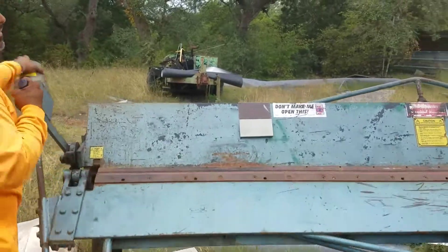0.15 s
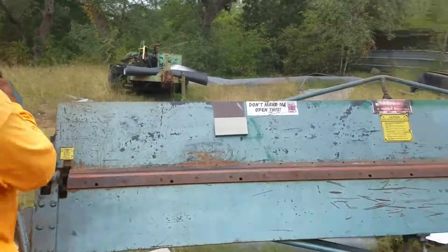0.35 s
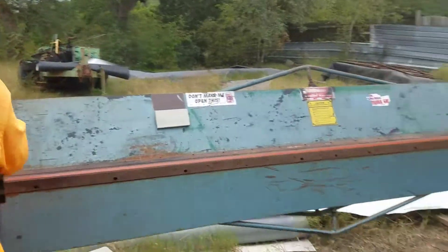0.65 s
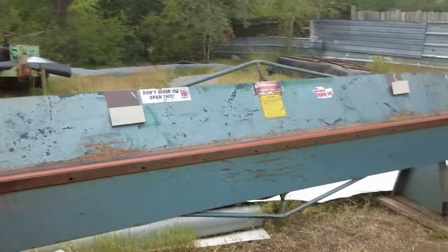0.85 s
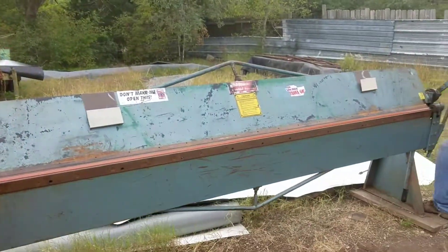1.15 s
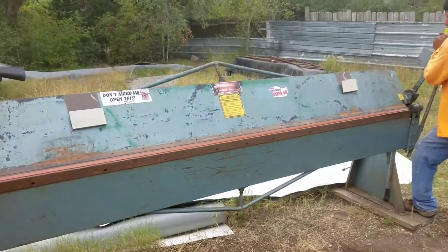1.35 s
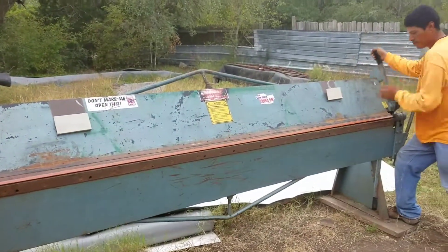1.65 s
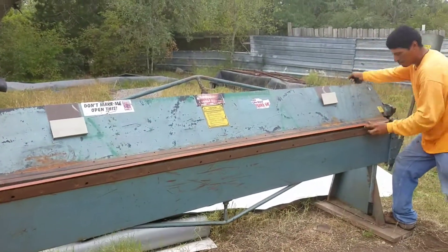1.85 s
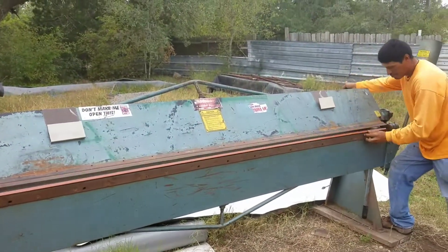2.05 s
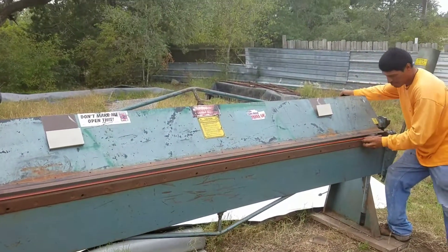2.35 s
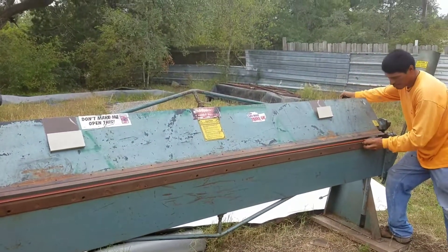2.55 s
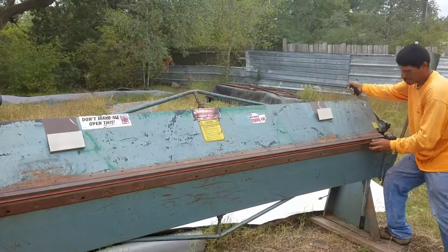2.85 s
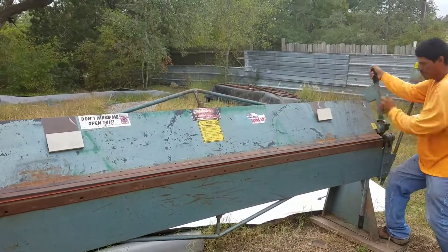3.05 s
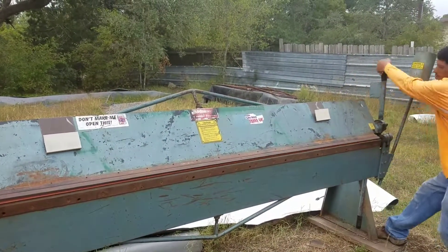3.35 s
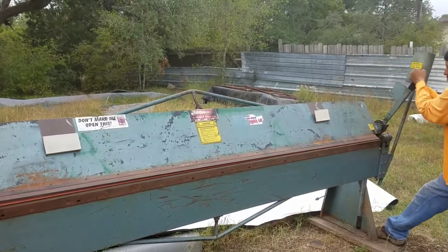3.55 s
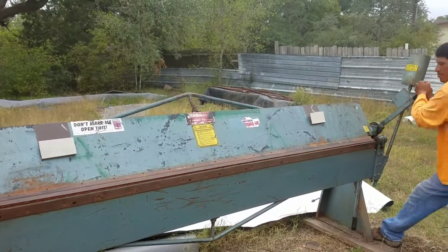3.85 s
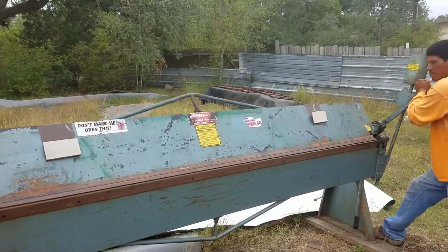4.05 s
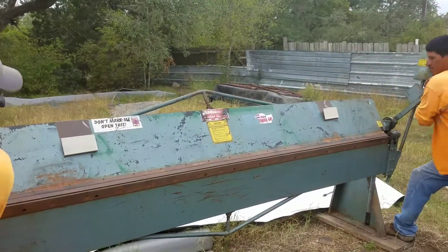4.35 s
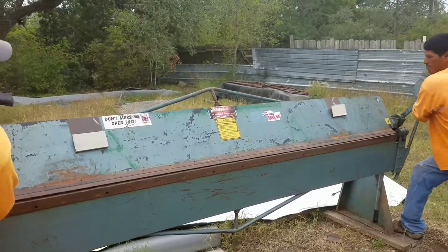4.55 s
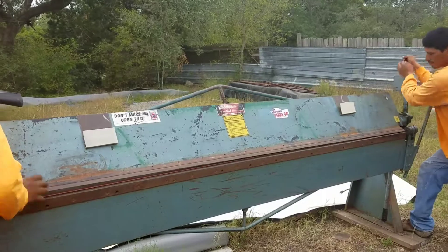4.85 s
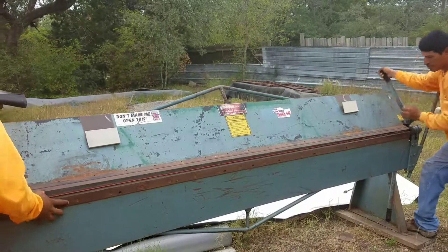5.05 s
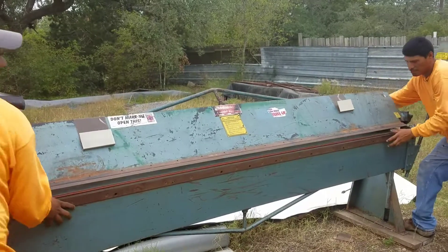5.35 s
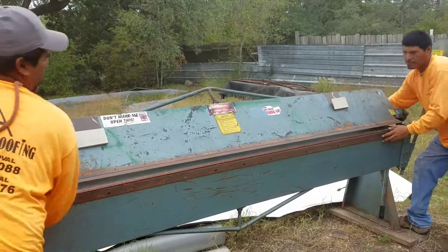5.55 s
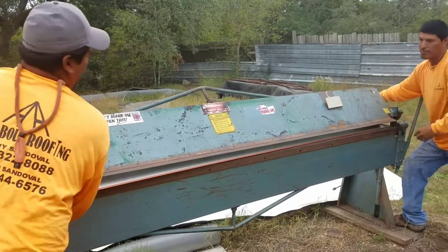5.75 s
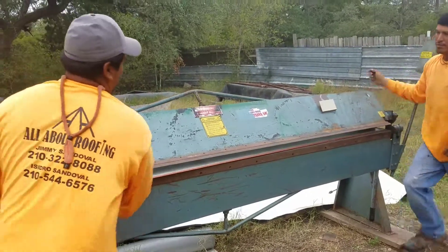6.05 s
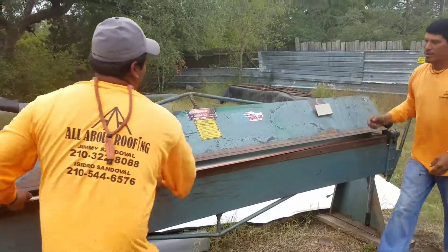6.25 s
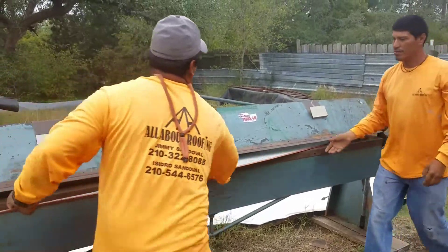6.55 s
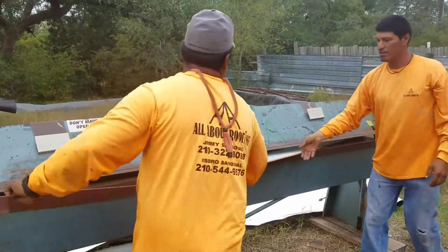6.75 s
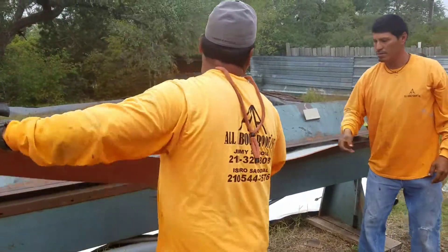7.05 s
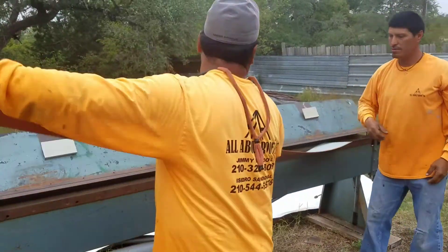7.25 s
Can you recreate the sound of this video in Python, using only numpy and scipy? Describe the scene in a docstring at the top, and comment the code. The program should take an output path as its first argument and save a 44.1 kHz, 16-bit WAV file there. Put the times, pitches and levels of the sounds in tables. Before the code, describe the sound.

In a quiet yard, a hand-worked metal bending machine is heard close by. Light steel knocks, dry ticks and short rubs of sheet metal build into sharper clanks and scrapes. A run of heavier, rattling clamp knocks follows, as faint engines drone far off and a low rumble rises. Finally the sheet is drawn out with a long rasping slide that sings for a moment, and one more hard clank falls.

```python
"""A long steel bending brake (a machine that folds sheet metal) stands in quiet outdoor air in a yard.
From the start, thin sheet rubs through its jaws in short drags, its edge ticks, and the clamp handles
knock; each slip or knock makes the steel ring. From about 1.4 s engines drone far off, and near 3 s
a low rumble swells as the knocks crowd together. From 6 s the sheet is drawn out in one long, gritty
pull: it sings briefly, and one last hard knock falls."""
import sys
import numpy as np
from scipy import signal
from scipy.fft import rfft, irfft, next_fast_len
from scipy.io import wavfile
from scipy.ndimage import uniform_filter1d

SR = 44100
rng = np.random.default_rng(int(sys.argv[2]) if len(sys.argv) > 2 else 0)


def dump(signal):
    """Clip the signal to [-1, 1] and save it as 16-bit WAV at the path in sys.argv[1]."""
    limited = np.clip(np.atleast_2d(signal).T, -1, 1)
    pcm = np.round(limited * 32767).astype(np.int16)
    wavfile.write(sys.argv[1], SR, pcm)


N = 325899

PLACES = 4   # contact spots on each steel body
PART_EDGES_HZ = 260, 700, 2500, 7500   # split five "parts", low to high: legs, frame, sheet, grit, hiss
# stereo width ("mid" is what both ears share, "side" is how they differ): f/Hz, side minus mid/dB
WIDTH = [(60, -9.5), (200, -13.5), (380, -20), (700, -5), (1290, -3.5), (2380, -2), (4400, -0.5),
         (15000, -2.5)]


def amp(db):
    """Turn decibels into a gain."""
    return 10 ** (np.asarray(db) / 20)


def in_time(rows):
    """Turn a table with times in its first column into curves, one value a sample."""
    times, *columns = np.transpose(rows)
    return [np.interp(np.arange(N) / SR, times, column) for column in columns]


def at_hz(points, hz):
    """Read a table at the given frequencies, on a log scale."""
    table = np.array(points)
    return np.interp(np.log(hz), np.log(table[:, 0]), table[:, 1])


def drift(per_s):
    """A random wander that takes a new direction per_s times a second."""
    return np.interp(np.arange(N) * per_s / SR, np.arange(1000), rng.standard_normal(1000))


def add(track, start_s, sound):
    """Lay a short sound into a track."""
    at = round(start_s * SR)
    track[:, at:at + sound.shape[1]] += sound[:, :N - at]


def air():
    """Far traffic and leaves make a smooth noise; only its bass swells."""
    # tone of the air noise as heard: f/Hz, relative level/dB
    spectrum = [(15, -29), (25, -32.5), (59, -5), (145, -2), (180, -8), (242, -3), (503, -17.5), (677, -9),
                (3250, -37), (4370, -45), (6050, -61.5), (10400, -44), (16000, -49.5)]
    # rumble below 270 Hz: t/s, level/dB
    rumble = [(0.0, -59), (1.6, -58.5), (2.4, -60), (3.1, -48), (3.85, -42.5), (4.5, -45), (5.1, -51.5),
              (6.8, -47.5), (7.39, -44)]
    hz = np.maximum(np.arange(N // 2 + 1) * SR / N, 1)
    noise = rfft(rng.standard_normal((2, N))) * amp(at_hz(spectrum, hz))
    noise[1] *= amp(at_hz(WIDTH, hz))
    low, high = irfft(noise * (hz < 270), N), irfft(noise * (hz >= 270), N)
    swell = amp(in_time(rumble)[0])
    return (low * swell + high * np.median(swell) * amp(-3.5)) / np.std(low[0])


def steel_rings(spectrum, strong_modes):
    """One click sets off many fading tones (modes) in steel. Axes: place, part, mid/side, time."""
    # how long steel rings: f/Hz, time to fade by 60 dB/s
    ring_times = [(200, 0.26), (500, 0.29), (1500, 0.2), (4500, 0.11), (12000, 0.028)]
    crack_db, crack_s = 9.5, 0.00099   # the first wave from the contact stands above the ring
    cloud_hz = np.linspace(10, 127, 1000) ** 2 * np.exp(rng.normal(0, .003, 1000))
    strong_hz, width_hz, above_db = np.transpose(strong_modes)
    hz = np.append(cloud_hz, strong_hz)
    t60 = np.append(at_hz(ring_times, cloud_hz), np.log(1000) / (np.pi * width_hz))
    filled_hz = np.append(np.gradient(np.sort(cloud_hz)), amp(2 * above_db) * width_hz * np.pi / 2)
    height = amp(at_hz(spectrum, hz)) * np.sqrt(filled_hz / t60)
    share = rng.standard_normal((PLACES, 2, len(hz)))   # every place moves every mode differently
    share[:, 0] = np.tanh(3 * share[:, 0])   # yet hardly ever misses one
    share[:, 1] *= amp(at_hz(WIDTH, hz))
    t = np.arange(SR // 3, dtype=np.float32) / SR
    modes = np.sin(2 * np.pi * np.outer(hz, t)) * np.exp(-np.log(1000) * np.outer(1 / t60, t))
    part = np.searchsorted(PART_EDGES_HZ, hz)
    rings = np.stack([(share * height)[:, :, part == k] @ modes[part == k] for k in range(5)], axis=1)
    rings *= 1 + amp(crack_db) * np.exp(-t / crack_s)
    bass_cut = signal.butter(5, 270, "high", fs=SR, output="sos")
    rings[:, 1:] = signal.sosfilt(bass_cut, rings[:, 1:])   # only the legs boom
    for k, top_hz in enumerate(PART_EDGES_HZ):   # a contact is too blunt to sound far above a part
        rings[:, k] = signal.sosfilt(signal.butter(3, 1.15 * top_hz, fs=SR, output="sos"), rings[:, k])
    rings[:, 0] = signal.sosfilt(signal.butter(2, 70, "high", fs=SR, output="sos"), rings[:, 0])
    return rings / np.sqrt(np.sum(rings[:, :, :1] ** 2, axis=3, keepdims=True))


def ring_out(forces, rings):
    """Every push (place, part, time) starts its own ring; all add up to mid and side."""
    size = next_fast_len(N + SR // 3)
    spectrum = np.einsum("pkf,pkcf->cf", rfft(forces, size), rfft(rings, size))
    return irfft(spectrum, size)[:, :N]


def rubbing_strength():
    """How hard frame, sheet, grit and hiss are rubbed: short drags, a faint stir and the long pull."""
    # short drags: t/s at full force, rise/s, hold/s, then level/dB of frame, sheet, grit, hiss
    drags = [(0.0, 0.042, 0.025, -40, -46.5, -59, -66), (0.384, 0.15, .015, -45, -49, -59, -67),
             (0.503, 0.067, 0.034, -51.5, -43.5, -60, -68), (0.834, 0.14, 0.057, -36, -48, -57.5, -70),
             (1.104, 0.21, 0.04, -38.5, -40.5, -49, -60.5), (1.461, 0.075, 0.033, -33, -49, -54, -62),
             (1.506, 0.073, 0.019, -24, -29, -38, -59), (1.543, .04, 0.07, -22.5, -21, -24.5, -30),
             (1.696, 0.023, .01, -36, -28.5, -31.5, -41), (1.787, 0.3, .05, -35.5, -38.5, -48, -63),
             (1.952, 0.11, 0.016, -36, -30, -37.5, -50), (2.03, 0.088, 0.027, -31, -27.5, -30.5, -39),
             (2.05, 0.027, 0.11, -24, -22.5, -21.5, -26.5), (2.312, 0.16, 0.037, -35.5, -44.5, -45.5, -54),
             (2.67, 0.064, 0.01, -50, -72, -58.5, -62), (3.083, 0.072, 0.083, -43, -46, -60.5, -74),
             (3.19, .04, .14, -39.5, -46.5, -53, -69), (3.522, 0.088, 0.025, -37, -57, -65, -67),
             (3.698, 0.04, 0.014, -24, -31, -42.5, -67), (3.77, 0.16, 0.023, -28.5, -58, -60, -72),
             (3.886, 0.55, 0.12, -41.5, -54, -66.5, -70.5), (4.093, 0.028, .025, -36.5, -37.5, -53, -75),
             (4.334, 0.26, 0.027, -44, -56, -74, -80), (4.47, .04, 0.02, -58, -60, -48, -55),
             (4.538, 0.023, 0.035, -31.5, -36, -36, -55), (4.591, 0.027, 0.05, -37.5, -37, -40, -47),
             (4.717, 0.12, 0.027, -30, -53, -56, -77), (4.76, 0.018, 0.016, -45, -37.5, -44, -55),
             (4.834, 0.03, 0.02, -30, -33.5, -26, -34), (4.88, .05, 0.016, -35, -42, -42, -64),
             (5.4, 0.12, 0.065, -48, -66, -63.5, -72), (5.524, 0.079, 0.21, -41, -44.5, -47.5, -53.5),
             (5.913, 0.089, 0.049, -40, -45.5, -56.5, -67)]
    # the sheet is drawn out of the jaws: t/s, then level/dB of frame, sheet, grit, hiss
    long_pull = [(6.04, -53, -63, -71, -82), (6.14, -39.5, -42.5, -49, -55),
                 (6.24, -42.5, -39.5, -46.5, -52.5), (6.38, -36.5, -32, -34.5, -40),
                 (6.52, -42, -37.5, -41, -47), (6.7, -37, -38, -38.5, -43.5),
                 (6.88, -40.5, -40.5, -42.5, -46), (6.98, -40, -41.5, -38.5, -39.5),
                 (7.39, -41.5, -47, -42.5, -46.5)]
    rise_db, fall_db_per_s = 34.5, (172.4, 194, 253, 260)
    stir_db = np.array([-57.5, -63, -70.5, -75])   # the loose sheet never lies quite still
    t, coarse_t = np.arange(N) / SR, np.arange(0, N + 64, 64) / SR
    power = 0
    for full_s, rise_s, hold_s, *levels_db in drags:
        before_db = rise_db * np.maximum(full_s - coarse_t, 0) / rise_s
        after_db = np.outer(fall_db_per_s, np.maximum(coarse_t - full_s - hold_s, 0))
        power = power + amp(2 * (np.array(levels_db)[:, None] - before_db - after_db))
    drag_power = np.array([np.interp(t, coarse_t, part) for part in power])
    stir_power = amp(2 * (stir_db[:, None] + 3.5 * drift(7.8)))
    pull_power = amp(2 * np.array(in_time(long_pull))) * (t > long_pull[0][0])
    return np.sqrt(drag_power + stir_power + pull_power)


def rubbing():
    """Rubbing is a stream of tiny random slips, more uneven and bunched in a jerky drag."""
    # how the sheet slides: t/s, roughness (0 even glide, 1 jerky drag)
    roughness = [(0, 1.), (2.5, 0.88), (5.0, 0.96), (5.5, 0.58), (6.2, 0.38), (7.39, 0.14)]
    slips_per_s, spread_db = (900, 2500, 5000, 9000), 3.5   # rates for frame, sheet, grit, hiss
    rough = in_time(roughness)[0]
    bunches = amp(3.16 * rough * drift(45))
    forces = []
    for strength, per_s in zip(rubbing_strength(), slips_per_s):
        sizes = amp(spread_db * rough * np.minimum(rng.exponential(1, N), 5))
        signs = rng.choice([-1, 1], N)
        slips = bunches * sizes * signs * (rng.random(N) < per_s / SR)
        average_size = np.sqrt(uniform_filter1d(slips ** 2, SR // 2))
        forces.append(strength * slips / average_size)
    return np.array(forces)


def sheet():
    """The sheet rings as the rubbing spot jumps about along the jaw, and its edge ticks."""
    # rubbed sheet and jaw as heard through the microphone, which dips near 8 kHz:
    # f/Hz, relative level/dB
    spectrum = [(200, -23.5), (300, 7), (385, 7), (520, -5), (750, 1), (1870, -3.5), (2170, -8.5),
                (3250, -9), (3950, -12.5), (4350, -7.5), (4950, -11), (5420, -15.5), (8420, -31.5),
                (10900, -16.5), (16000, -21.5)]
    # tones that stand out: f/Hz, width/Hz, level above the rest/dB
    strong_modes = [(382, 54, 3.5), (461, 16, 9), (611, 37, 6), (981, 88, 3.5), (1260, 36, 2),
                    (1548, 46, 4), (1653, 26, 3), (1886, 39, 6.5), (1933, 14, 3), (2372, 76, 8.5),
                    (3570, 33, 5.5), (4117, 68, 5), (4430, 68, 5.5), (4853, 50, 6.5)]
    rings = steel_rings(spectrum, strong_modes)[:, 1:]   # rubbing does not reach the legs
    place = rng.integers(0, PLACES, N // 900 + 1).repeat(900)[:N]
    touching = place == np.arange(PLACES)[:, None]
    return ring_out(touching[:, None] * rubbing(), rings) + edge_ticks(rings)


def edge_ticks(rings):
    """The edge of the sheet gives dry ticks: it is held, so its ring dies at once."""
    # ticks: t/s, then relative level/dB of sheet, grit, hiss
    ticks = [(0.026, -13.5, -34, -36), (0.3844, -45, -39, -52), (0.48, -29, -50, -68),
             (0.69, -18, -40, -64), (0.706, -22, -42, -68), (0.732, -24, -52, -70), (0.758, -27, -50, -70),
             (0.92, -36, -43, -48), (1.1196, -40, -22, -58), (1.152, -17, -36, -62), (1.198, -22, -42, -64),
             (1.461, -26, -31, -28), (1.49, -21, -30, -29), (3.263, -27, -40, -39), (3.3488, -44, -29, -38),
             (3.53, -32, -32, -58), (4.295, -34, -34, -32), (4.3024, -46, -43, -56),
             (4.3465, -50, -34, -50), (4.3685, -46, -40, -60), (4.4057, -29, -39, -52),
             (4.487, -44, -40, -38), (4.5027, -32, -42, -36), (4.521, -28, -42, -31),
             (4.5504, -28, -20, -28), (4.5664, -22, -28, -25), (4.6194, -36, -30, -30),
             (4.6478, -37, -34, -33), (4.8184, -28, -18, -19), (5.439, -25, -59.5, -66),
             (5.957, -40, -44, -42), (6.013, -27, -48, -56)]
    decay_s, boost_db = 0.002, 8
    damped = rings[:, 1:, :, :600] * np.exp(-np.arange(600) / (decay_s * SR))
    sound = np.zeros((2, N))
    for k, (start_s, *levels_db) in enumerate(ticks):
        gains = amp(np.array(levels_db) + boost_db)
        add(sound, start_s, np.tensordot(gains, damped[k % PLACES], 1))
    return sound


def clamp_knocks():
    """Thrown handles strike a few places in turn; each blow is a short chatter of loose steel."""
    # blows: t/s, then relative level/dB of sheet, legs, frame, grit, hiss, then chatter time/s
    blows = [(0.026, -27, -41, -35, -54, -48, .002), (0.121, -26.5, -64, -39, -41, -55, .004),
             (0.222, -33.5, -66, -30, -42, -62, 0.018), (0.69, -34, -64, -57, -48, -75, 0.004),
             (0.835, -27, -31, -33, -61, -66, 0.017), (1.106, -23.5, -54, -36, -48, -56, .004),
             (1.493, -16, -27, -19, -31, -32, .008), (1.701, -15.5, -33.5, -21, -20, -28, .0035),
             (2.051, -15, -50.5, -21.5, -22, -17.5, .004), (2.335, -30, -64, -24.5, -29, -38.5, 0.006),
             (2.985, -28.5, -46.5, -34.5, -60, -80, 0.013), (3.071, -30, -30, -23, -32.5, -50, 0.0077),
             (3.105, -38, -36, -21.5, -33.5, -38, 0.0084), (3.149, -26.5, -23, -18, -44, -61, 0.004),
             (3.186, -30, -43, -22, -27.5, -37, 0.0061), (3.213, -34, -41, -28, -29.5, -40, 0.018),
             (3.52, -22.5, -23, -20, -43, -68, 0.0072), (3.686, -8.5, -26, -28, -35, -62, 0.0055),
             (3.698, -9, -7.5, -22, -20.5, -46, 0.011), (4.098, -14.5, -36, -22, -31.5, -65, 0.0031),
             (4.405, -28.5, -42, -31, -46.5, -65, 0.0028), (4.506, -26, -45, -18, -56, -55, 0.015),
             (4.532, -27, -29, -39, -32, -41, 0.0084), (4.708, -16.5, -22.5, -16.5, -37.5, -62, 0.011),
             (4.782, -27, -22.5, -15, -25, -54, 0.0055), (4.841, -22.5, -28, -17, -20, -23, 0.0072),
             (5.319, -31.5, -33, -33, -66, -72, 0.0098), (5.404, -35, -32, -50, -68, -62, 0.0033),
             (5.439, -32, -45, -30, -62, -68, 0.0046), (5.466, -37, -36, -26.5, -66, -67, 0.0022),
             (5.909, -33, -40, -29, -39.5, -57, .011), (6.013, -29, -51, -42, -44.5, -59, 0.0027),
             (6.091, -32, -46, -18, -50, -58, 0.0037), (6.761, -16, -43, -15.5, -16.5, -27, 0.007)]
    # struck clamp and beam as heard through the microphone, which dips near 8 kHz:
    # f/Hz, relative level/dB
    spectrum = [(53, -35), (90, 5.5), (345, 11.5), (606, -0.5), (998, -0.5), (1410, -5), (1610, -10.5),
                (3220, -24.5), (4170, -17.5), (6870, -48), (8910, -41), (11600, -16.5), (16000, -33.5)]
    # tones that stand out: f/Hz, width/Hz, level above the rest/dB
    strong_modes = [(130, 7.9, 12), (233, 4.5, 4), (313.8, 16, 13), (398, 7.3, 3.3), (442, 28, 5.3),
                    (476, 18, 3), (827, 9.1, 6.9), (954, 7.9, 5.4), (1130, 3.4, 3), (1259, 11, 7.1),
                    (1800, 21, 3), (1940, 7.2, 3.1), (2160, 16, 2.3), (4820, 46, 12)]
    rise_share, boost_db = .07, 16.5   # boosted because ringing spreads a click out in time
    forces = np.zeros((PLACES, 5, N))
    shakes = rng.standard_normal((len(blows), 4000)) ** 3   # cubing makes the noise spiky
    for k, (start_s, sheet_db, legs_db, frame_db, grit_db, hiss_db, chatter_s) in enumerate(blows):
        gains = amp(np.array([legs_db, frame_db, sheet_db, grit_db, hiss_db]) + boost_db)
        age = np.arange(4000) / (chatter_s * SR)
        burst = shakes[k] * (1 - np.exp(-age / rise_share)) * np.exp(-age)
        burst /= np.sqrt(np.sum(burst ** 2))
        add(forces[k % PLACES], start_s, gains[:, None] * burst)
    return ring_out(forces, steel_rings(spectrum, strong_modes))


def engines():
    """Two far engines, each a wavering tone that fades in before its table starts and out after it."""
    # lower engine: t/s, f/Hz, level/dB
    low_drone = [(1.4, 92.1, -74), (1.59, 88.6, -51.5), (2.12, 89.53, -64), (2.22, 94, -72),
                 (2.65, 86.2, -62), (3.05, 72.2, -48), (3.38, 68.66, -57.5), (6.54, 65.4, -50.5),
                 (6.7, 64.4, -63)]
    # higher engine: t/s, f/Hz, level/dB
    high_drone = [(2.6, 142.3, -62), (3.2, 142, -53), (3.6, 142, -61), (4.3, 144.6, -57.5),
                  (4.85, 150.4, -48.5), (5.6, 152, -51), (5.8, 151, -60.5), (6.9, 151.7, -55.5),
                  (7.39, 153.6, -47.5)]
    t, fade_s = np.arange(N) / SR, 0.23
    sound = np.zeros(N)
    for rows in low_drone, high_drone:
        hz, level_db = in_time(rows)
        fade = np.clip(np.minimum(t - rows[0][0], rows[-1][0] - t) / fade_s + 1, 0, 1)
        phase = 2 * np.pi * np.cumsum(hz * (1 + 0.0045 * drift(5.6))) / SR
        sound += np.sqrt(2) * fade * amp(level_db + 2.0 * drift(6.4)) * np.sin(phase)
    return sound


def sheet_singing():
    """The sliding sheet sings as friction noise drives one of its modes."""
    # swell of the note: t/s, level/dB
    swell = [(6.2, -60), (6.32, -42.5), (6.48, -34.5), (6.56, -54), (6.6, -90)]
    note_hz, width_hz = 1962, 140
    radius = np.exp(-np.pi * width_hz / SR)
    resonance = [1, 0, -1, 1, -2 * radius * np.cos(2 * np.pi * note_hz / SR), radius ** 2]
    note = signal.sosfilt([resonance, resonance], rng.standard_normal(N))   # twice, for a purer note
    level_db = in_time([(swell[0][0] - .1, -100)] + swell)[0]
    return amp(level_db) * note / np.sqrt(np.mean(note ** 2))


def scene():
    """Add up all sounds as mid and side, then turn them into left and right."""
    right_louder_db = 1.73
    mid, side = sheet() + clamp_knocks() + air()
    mid = mid + engines() + sheet_singing()
    return np.array([mid + side, mid - side]) * amp([[-right_louder_db / 2], [right_louder_db / 2]])


def record(dry):
    """Cut the highest treble, from 16.8 kHz up."""
    return signal.sosfilt(signal.cheby2(12, 70, 16800, fs=SR, output="sos"), dry)


dry = scene()
out = record(dry)
dump(out)
```